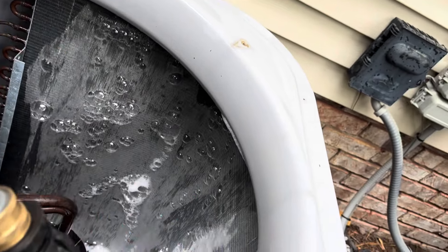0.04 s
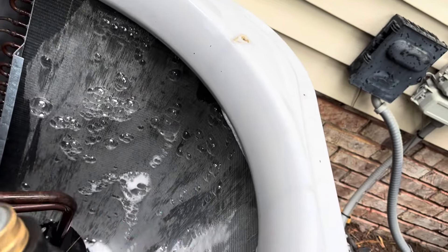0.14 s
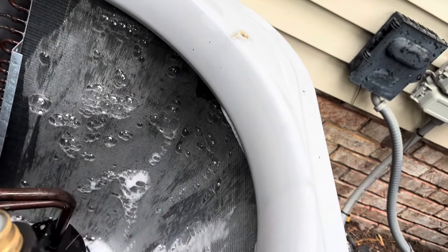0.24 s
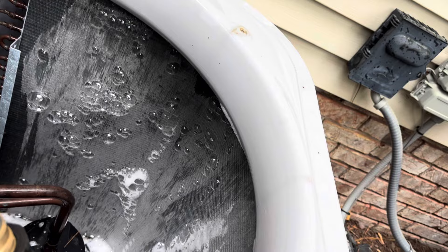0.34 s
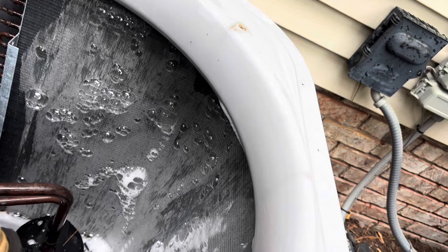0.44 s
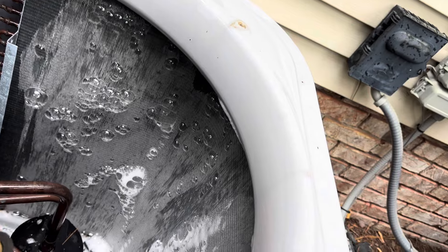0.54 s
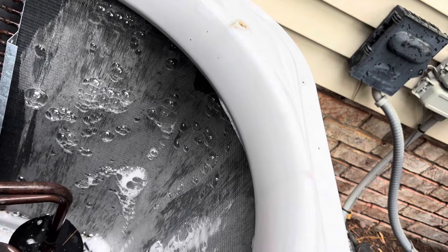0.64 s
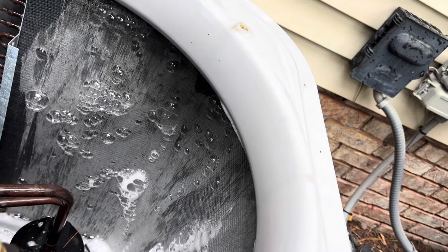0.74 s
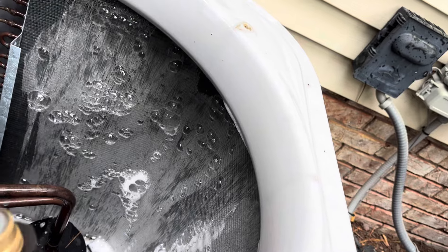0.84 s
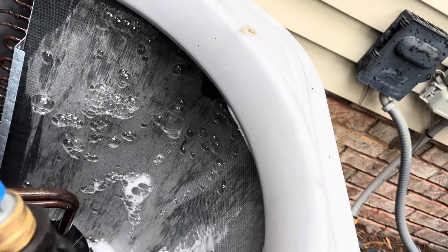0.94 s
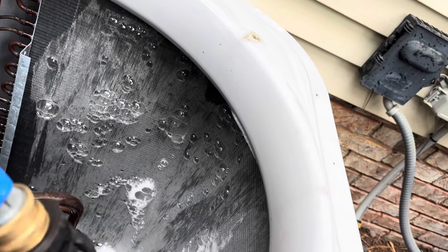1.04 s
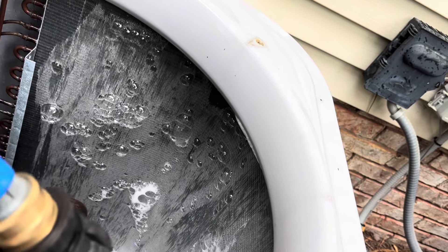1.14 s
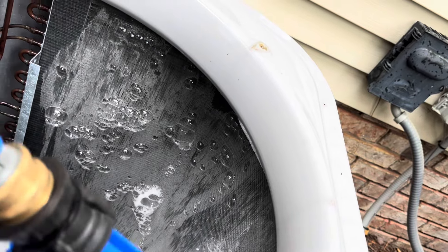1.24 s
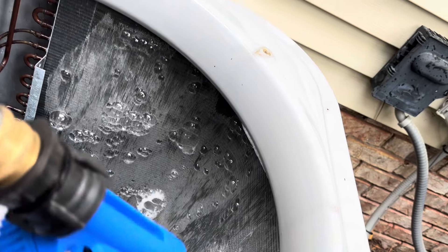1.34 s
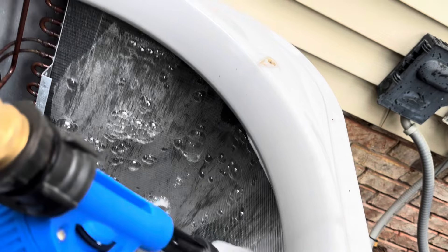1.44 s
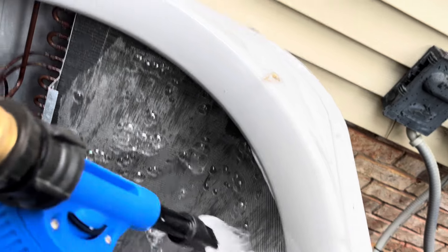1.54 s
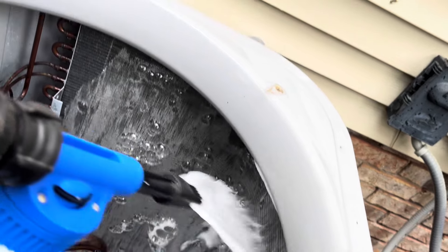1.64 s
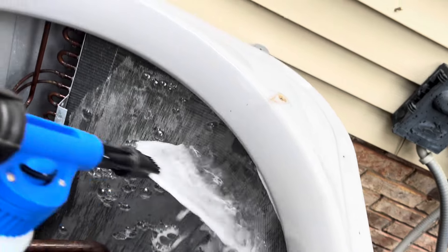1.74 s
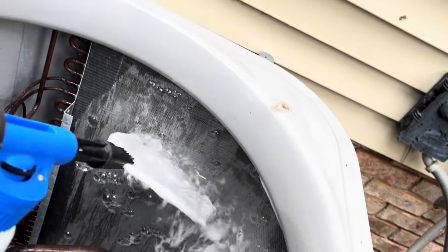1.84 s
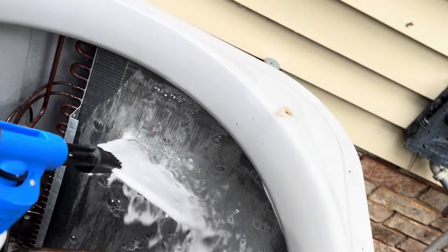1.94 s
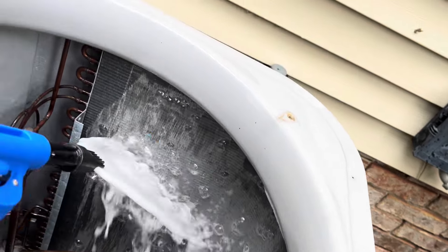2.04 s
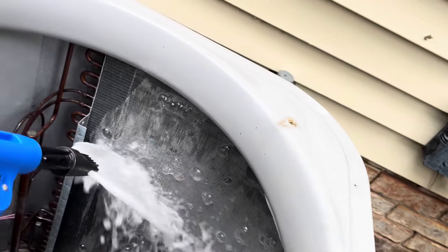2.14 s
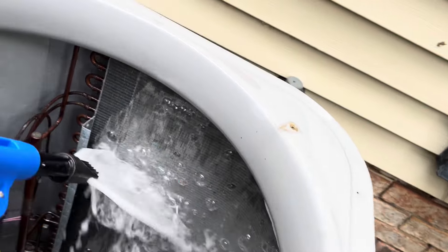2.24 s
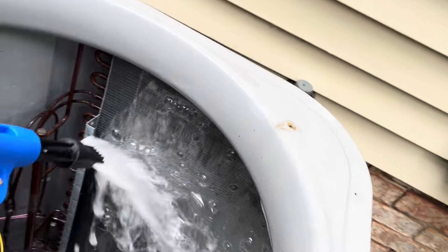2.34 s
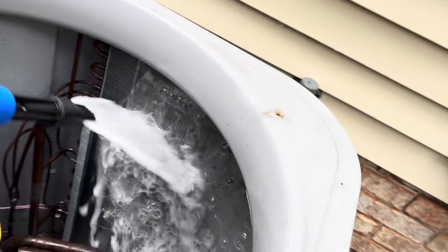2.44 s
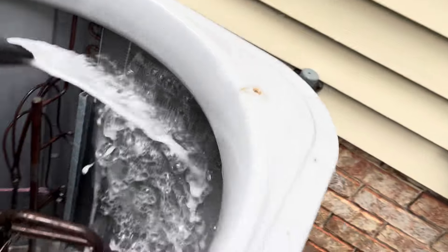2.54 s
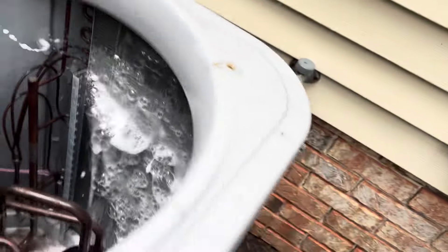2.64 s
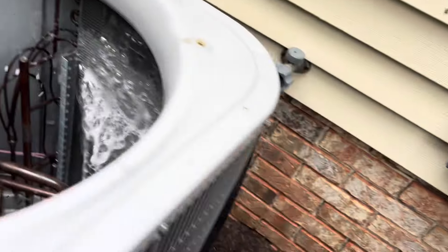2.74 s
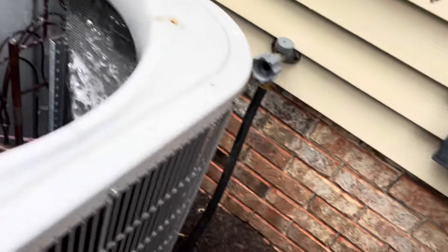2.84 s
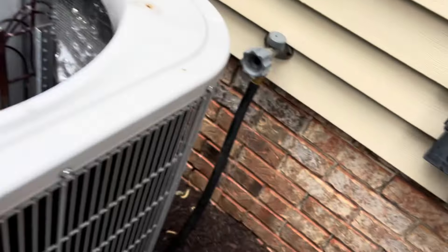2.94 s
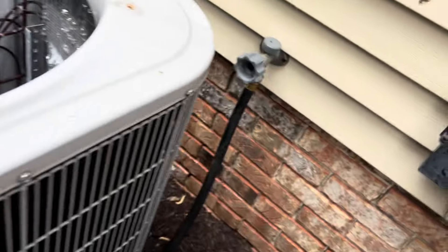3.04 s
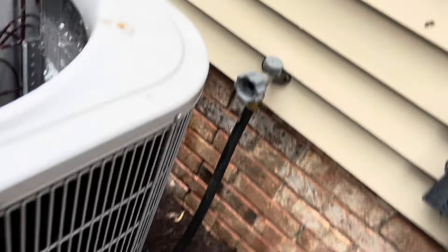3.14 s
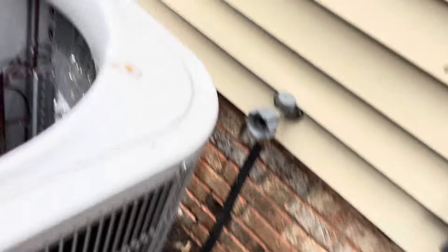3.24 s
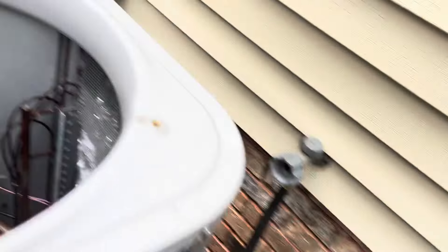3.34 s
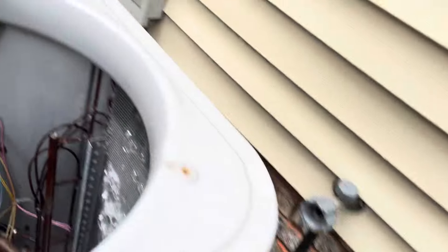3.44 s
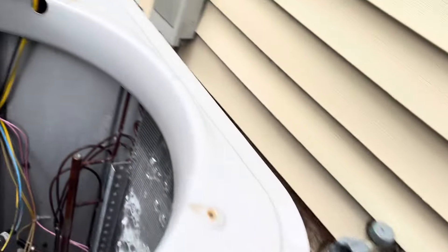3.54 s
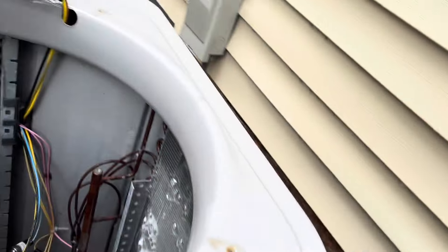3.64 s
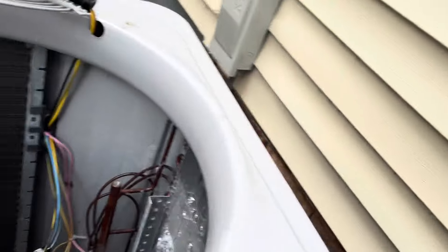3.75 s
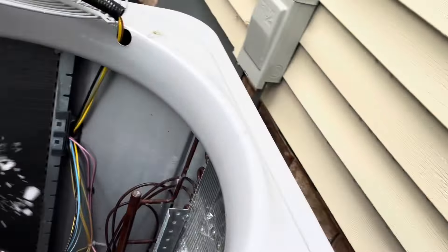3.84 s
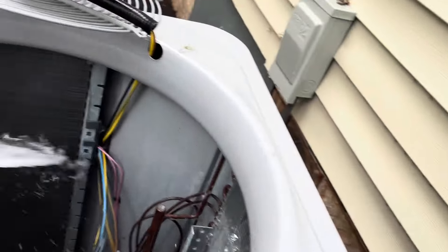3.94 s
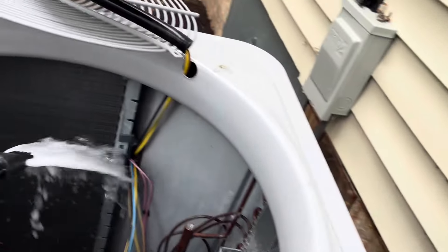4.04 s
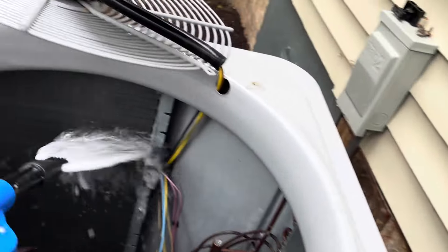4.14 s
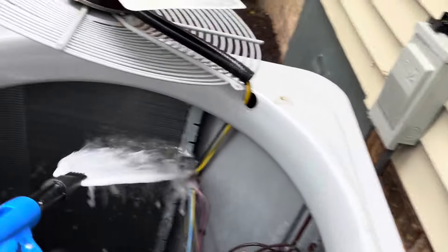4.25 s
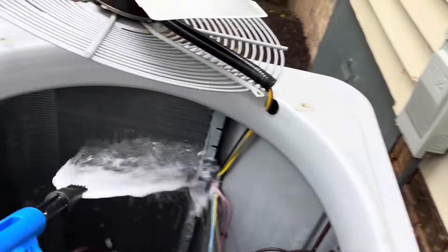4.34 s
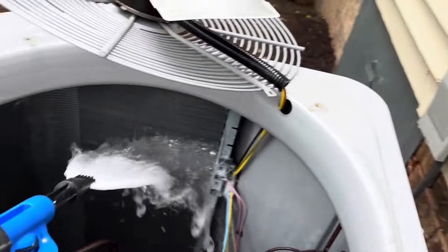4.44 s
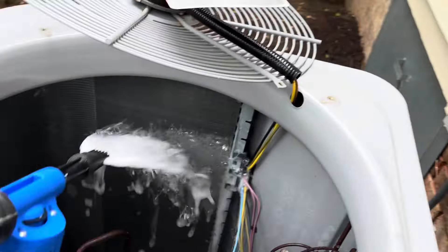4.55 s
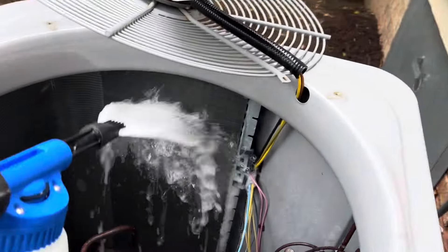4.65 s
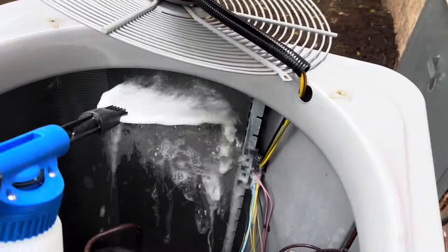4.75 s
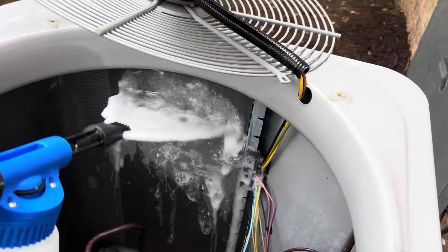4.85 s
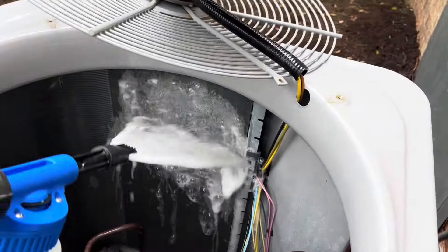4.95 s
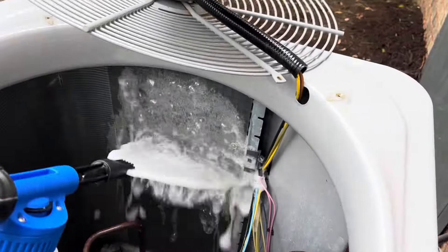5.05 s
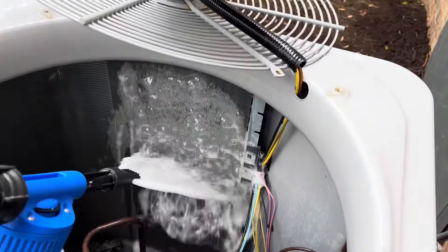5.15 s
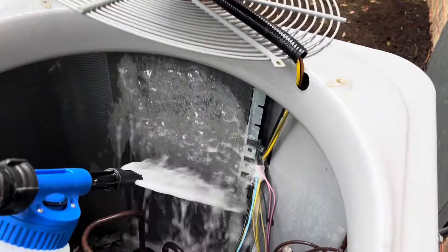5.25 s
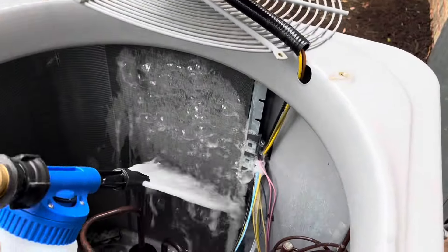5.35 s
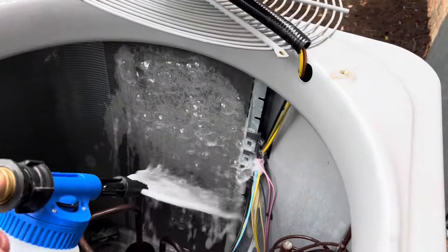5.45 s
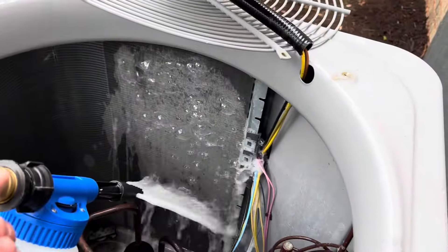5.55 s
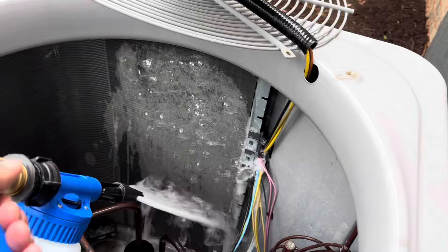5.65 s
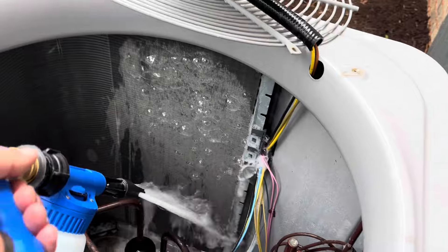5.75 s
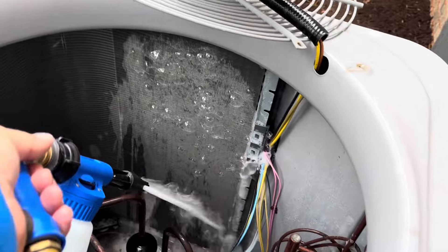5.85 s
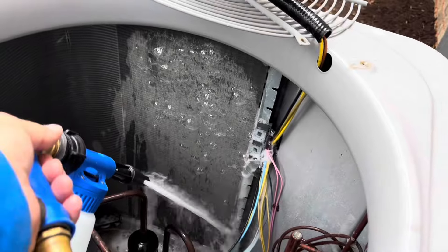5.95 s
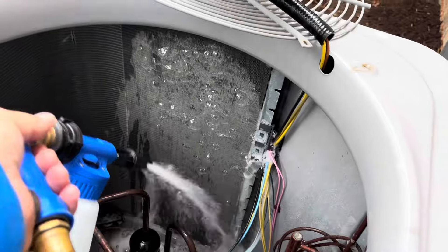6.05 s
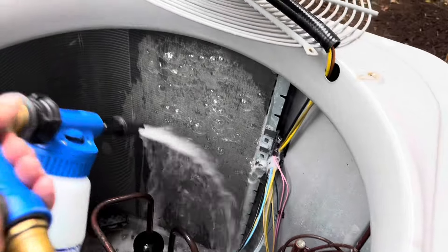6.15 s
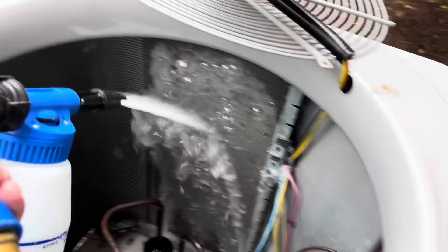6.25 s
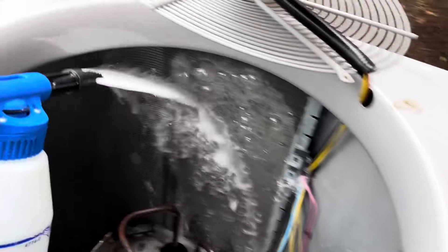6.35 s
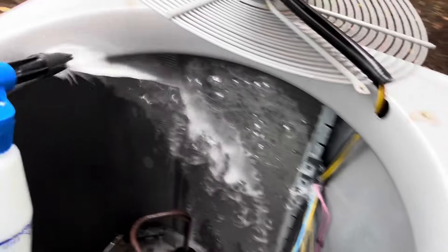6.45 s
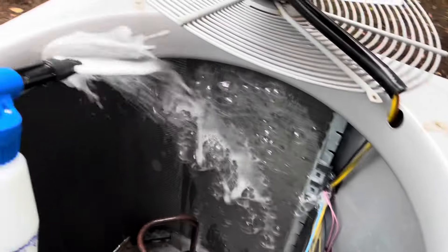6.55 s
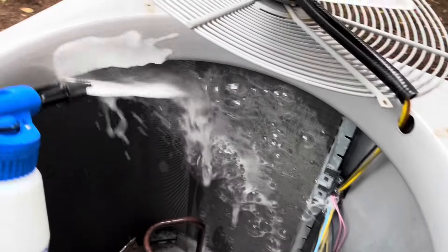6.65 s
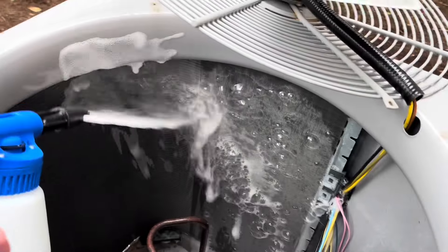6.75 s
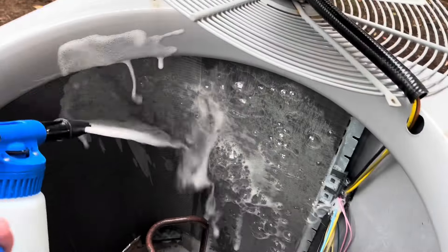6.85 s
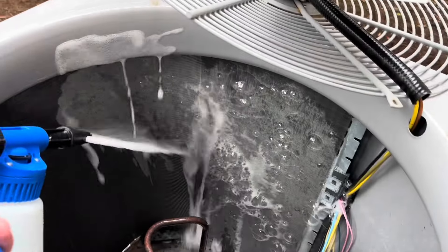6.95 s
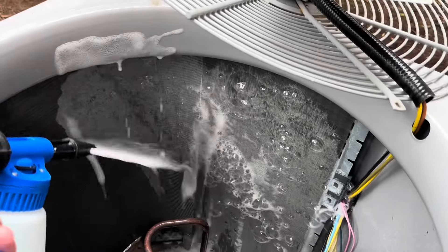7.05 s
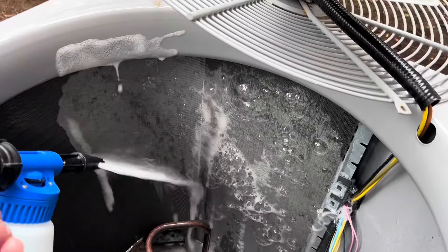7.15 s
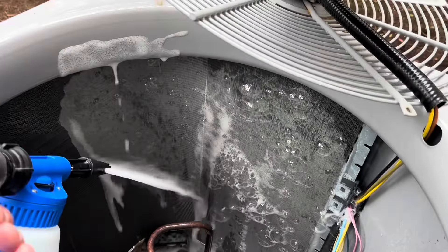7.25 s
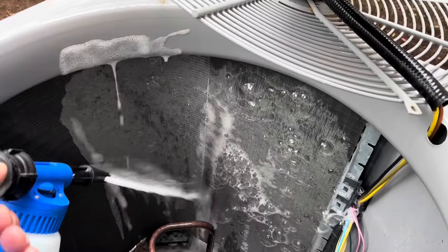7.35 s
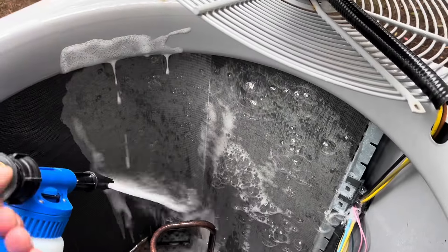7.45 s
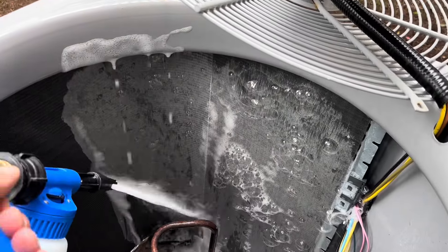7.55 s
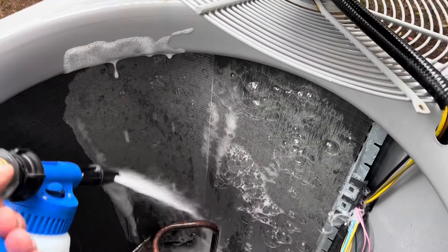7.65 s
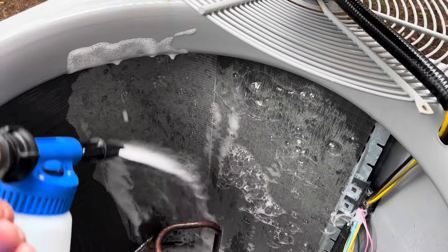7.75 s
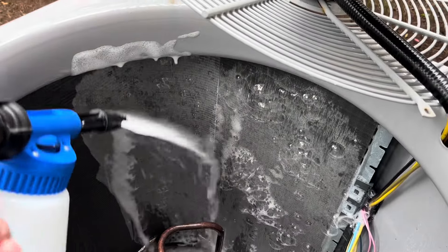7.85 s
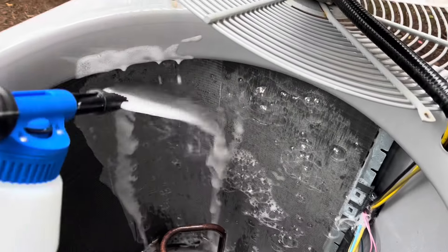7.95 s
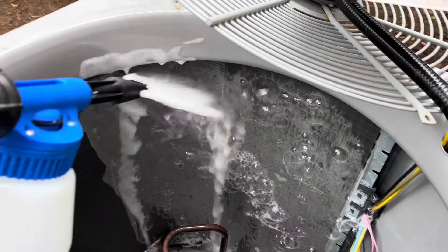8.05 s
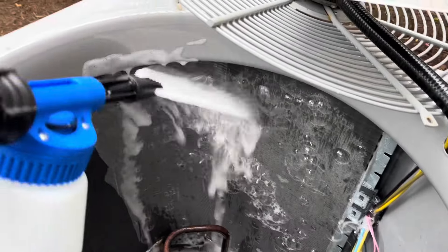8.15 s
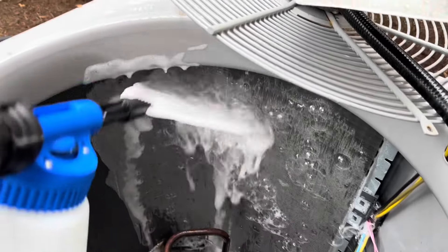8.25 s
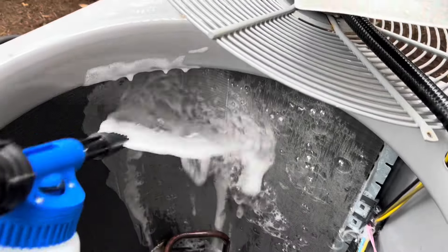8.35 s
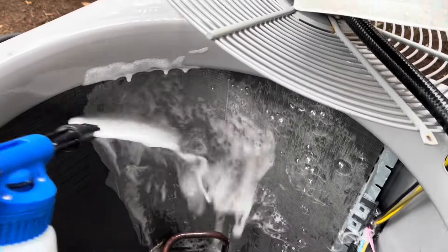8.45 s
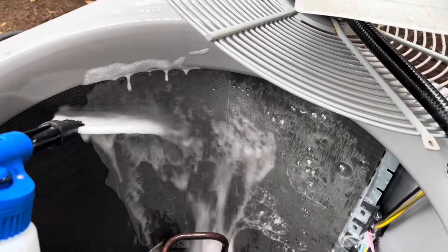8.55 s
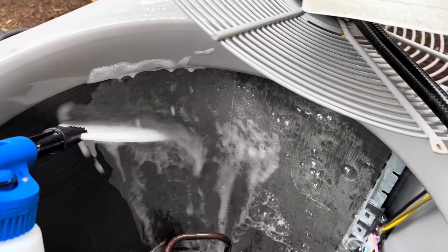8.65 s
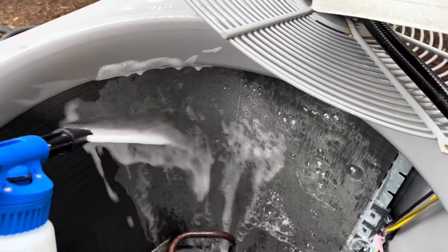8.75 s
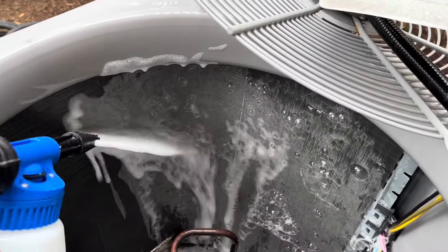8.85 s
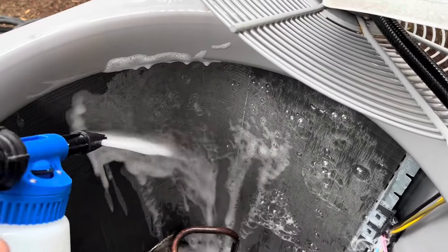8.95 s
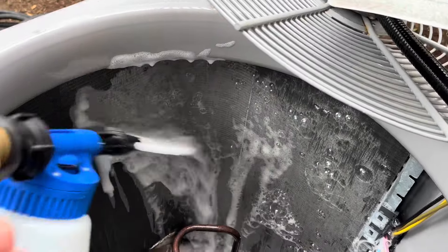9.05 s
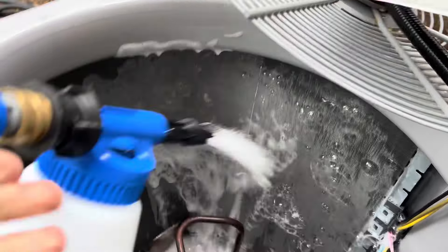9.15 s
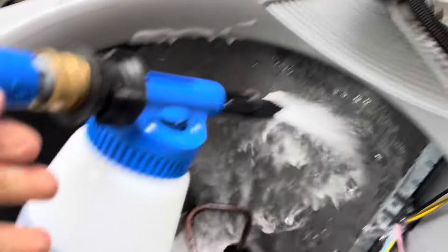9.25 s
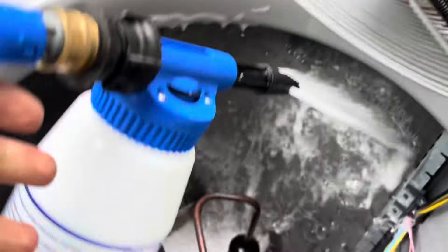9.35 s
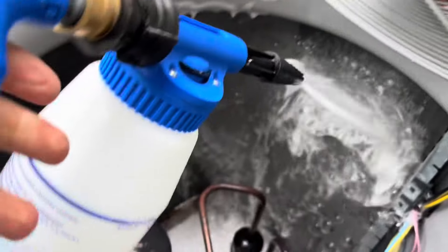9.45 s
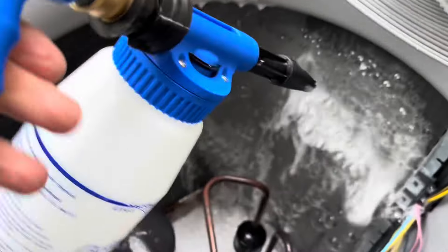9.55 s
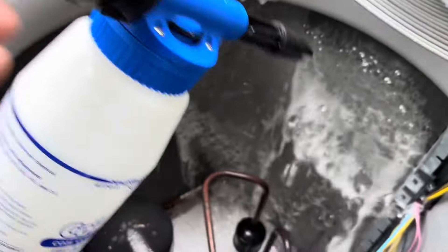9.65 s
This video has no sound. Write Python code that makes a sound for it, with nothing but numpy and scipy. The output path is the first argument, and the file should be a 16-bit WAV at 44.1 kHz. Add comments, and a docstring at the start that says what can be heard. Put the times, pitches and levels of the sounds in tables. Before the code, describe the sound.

Close stereo microphone beside a hollow metal cabinet: pressurized foam spray hisses, whistles and drums on thin fins, coloured by short wall echoes. A click and knocks end it, leaving soft wet dribbling, a tiny squeak and a clink. Trapped air squeals as the spray bursts back, wavering as it sweeps across the metal, with several hollow bumps and plastic ticks. At the very end it cuts to a bang and dripping over distant rumble.

```python
"""A hose-fed foam gun sprays the fins inside the sheet-metal cabinet of an outdoor cooling unit.
First its nozzle hisses and whistles while the jet splashes and drums on the coil, and the walls echo it.
The trigger is let go: foam dribbles, gun and hose knock on the metal, the gun squeaks and a fitting clinks.
Trapped air then shrieks out as the jet returns; more knocks follow, and at the end the jet stops and drips.
Filtered noise makes the spray, foam and far machine rumble; fading tones and noise bursts make the blows."""
import sys
import numpy as np
from scipy import signal
from scipy.fft import rfft, irfft, next_fast_len
from scipy.io import wavfile

SR = 44100
rng = np.random.default_rng(int(sys.argv[2]) if len(sys.argv) > 2 else 0)


def waveform_to_disk(signal):
    """Save audio, clipped to [-1, 1], as 16-bit WAV at the path in sys.argv[1]."""
    frames = np.transpose(np.atleast_2d(signal))
    scaled = np.clip(frames, -1, 1) * 32767
    samples = np.round(scaled).astype(np.int16)
    wavfile.write(sys.argv[1], SR, samples)


N = 427329
HOP = 256  # samples between the frames in which moving spectra are drawn
TIME = np.arange(N) / SR
FRAME_S = np.arange(N // HOP + 5)[:, None] * HOP / SR
BIN_HZ = np.fft.rfftfreq(4 * HOP, 1 / SR)

# squeezes of the trigger:
# (opens [s], closes [s], width of the coil face's note [Hz], lift of that note [dB])
SQUEEZES = [(-0.5, 2.497, 90, 4.5), (3.705, 9.419, 110, 6)]
# resonances of the air inside the cabinet: (pitch [Hz], width [Hz], lift [dB])
CABINET_AIR = [(627, 150, 3), (900, 170, 8), (1018, 69, -5.5), (1164, 90, 7), (1315, 320, -3.5),
               (1665, 340, 5.5), (2060, 180, 1), (2200, 146, 5.5), (2390, 150, 1.5), (2616, 220, 5.5),
               (3000, 300, -0.5), (3350, 210, 1.5), (3540, 110, -1.5), (3790, 150, 4.5), (4140, 220, -1.5),
               (4700, 230, 6), (5870, 550, 3)]
# nozzle whistle and hiss as the gun moves, before the offsets in nozzle():
# (time [s], hiss level [dB], lift of the lower hiss [dB], lift of the whistle [dB])
NOZZLE_MOVES = [(0, -35, -3.5, -3.5), (0.25, -38, -2, -3.5), (0.7, -36, -4.5, -5.5), (1.35, -32.5, -5, -3),
                (2.05, -34.5, -6.5, -4), (2.45, -34.5, -7, -2), (4.15, -33, -9.5, -1), (4.35, -36, -6, -4),
                (4.7, -34, -7, -2.5), (5.4, -35.5, -8, -3.5), (5.9, -34.5, -9.5, -2.5),
                (6.55, -34.5, -9, -3.5), (6.85, -35.5, -8.5, -6), (7.5, -35.5, -10, -4.5),
                (7.85, -34, -8, -4), (8.5, -35.5, -7.5, -3.5), (9.0, -35, -8.5, -5),
                (9.27, -33.5, -10.5, -2.5)]
# spectrum of fine spray: (frequency [Hz], relative level [dB])
FINE_SPRAY = [(6000, -18), (9300, 0), (12000, -0.5), (14000, 2.5), (15700, 1.5)]
# spectrum of the jet drumming on the coil: (frequency [Hz], relative level [dB])
COIL_DRUM = [(60, -48), (120, 6.5), (170, 5.5), (260, 2.5), (380, -1.5), (600, -12), (1500, -57)]
# spectrum of a sharp click: (frequency [Hz], relative level [dB])
CLICK_SPECTRUM = [(300, 0), (1200, 6.5), (2600, -3.5), (4300, -5.5), (5500, -13), (9000, -13), (15000, -19)]


def amp(db):
    """Turns decibels into a gain."""
    return 10 ** (np.asarray(db) / 20)


def evened(x):
    """Scales a sound to rms 1."""
    return x / np.sqrt(np.mean(x ** 2) + 1e-20)


def colour(points, hz=BIN_HZ):
    """Gain of a spectrum table at the given frequencies."""
    f, db = np.transpose(points)
    return amp(np.interp(np.log(hz + 1), np.log(f), db))


def follow(rows, t):
    """Reads the columns of a table at the places t, with straight lines between its rows."""
    s, *columns = np.transpose(rows)
    return [np.interp(t, s, c) for c in columns]


def bell(hz, centre, width):
    """Gain of one resonance: 1 at its centre, less to either side."""
    return 1 / np.sqrt(1 + (2 * (hz - centre) / width) ** 2)


def lifted(hz, resonances):
    """Gain of a table of resonances standing on a flat floor."""
    return amp(sum(db * bell(hz, centre, width) ** 2 for centre, width, db in resonances))


def dying(t, t60):
    """Falls 60 dB in t60 seconds."""
    return np.exp(-np.log(1000) * t / t60)


def swell(middle, length):
    """A smooth rise and fall of height 1."""
    return np.exp(-2 * ((TIME - middle) / length) ** 2)


def swells(rows, rest_db):
    """Gain of a table of swells standing on a steady level."""
    power = sum((amp(db) * swell(middle, length)) ** 2 for middle, length, db, *_ in rows)
    return np.sqrt(amp(rest_db) ** 2 + power)


def drift(t, rate):
    """Random wandering of rms 1, with changes up to the given rate per second."""
    speeds = np.geomspace(rate / 10, rate, 20)
    return evened(sum(np.sin(2 * np.pi * (f * t + rng.random())) / np.sqrt(f) for f in speeds))


def sample_drift(rate):
    """The same wandering, drawn frame by frame and filled in for every sample."""
    return np.interp(TIME, FRAME_S[:, 0], drift(FRAME_S[:, 0], rate))


def flutter(depth_db, rate):
    """A gain that wavers at random."""
    return amp(depth_db * sample_drift(rate))


def noise(gain):
    """Two unrelated noises of rms 1 with a fixed or moving spectrum."""
    z = rng.standard_normal((2, len(FRAME_S), 2 * len(BIN_HZ))).view(complex) * gain
    _, sound = signal.istft(z, nperseg=4 * HOP, noverlap=3 * HOP, time_axis=1, freq_axis=2)
    return evened(sound[:, :N])


def burst(gain):
    """Two unrelated noises of rms 1 with the given spectrum, made in one piece."""
    return evened(irfft(rng.standard_normal((2, 2 * len(gain))).view(complex) * gain))


def add(mix, s, sound):
    """Adds a sound to the mix from time s on."""
    part = mix[:, round(s * SR):][:, :sound.shape[1]]
    part += sound[:, :part.shape[1]]


def jet():
    """Spray leaves the nozzle and lands on the coil; the valve lets it through or stops it."""
    open_s, shut_s = 0.037, 0.037  # how long the valve takes to open and to shut
    valve = 0
    for opens, closes, *_ in SQUEEZES:
        ramp = np.minimum((TIME - opens) / open_s, (closes - TIME) / shut_s)
        valve = valve + np.clip(ramp + .5, 0, 1)
    # air in the line starves the jet soon after the valve opens
    starve_after_s, starve_length_s = 0.19, 0.29
    starved = sum(swell(opens + starve_after_s, starve_length_s) for opens, *_ in SQUEEZES)
    space = roaming_hollow() * wall_echoes()
    stream = nozzle(space, starved) + landing(space, starved)
    # slugs of foam make the whole stream waver
    return stream * flutter(depth_db=.5, rate=70) * valve


def nozzle(space, starved):
    """Turbulence at the nozzle hisses and rings its cavity as a whistle, with fine spray on top."""
    # spectrum of the hiss: (frequency [Hz], relative level [dB])
    hiss_spectrum = [(900, -35), (1900, -8), (2400, -5.5), (3300, 1), (4200, 1.5), (5300, -0.5), (6000, 0),
                     (8000, 3), (9000, -2.5), (12000, -4.5), (15700, -5.5)]
    # middle note of the whistle: (time [s], pitch [Hz])
    whistle_notes = [(0, 7200), (1, 7140), (1.3, 7430), (2.5, 7490), (4.15, 7400), (4.6, 7200),
                     (5.25, 7270), (5.7, 7120), (6.15, 7430), (6.65, 7420), (7.35, 7100), (8.6, 7400),
                     (9.4, 7050)]
    hiss_db, _, ringing_db = follow(NOZZLE_MOVES, TIME)
    _, facing_db, _ = follow(NOZZLE_MOVES, FRAME_S)

    # the aim of the gun brings the lower part of the hiss forward or turns it away
    aimed = amp((facing_db + 4) * bell(BIN_HZ, centre=3300, width=5100) ** 2)
    hiss = amp(hiss_db - 6.5 * starved) * noise(colour(hiss_spectrum) * space * aimed)

    pitch = follow(whistle_notes, FRAME_S)[0] + 70 * drift(FRAME_S, rate=11)  # wobble of 70 Hz rms
    whistle_db = hiss_db + 1.9 * ringing_db + 2 - 15 * starved
    whistle = amp(whistle_db) * noise(cavity(pitch) * space) * flutter(depth_db=1.5, rate=27)

    # fine spray spreads widely: it takes 0.97 of the hiss's changes around its usual -35 dB
    fizz_db = -39 + 0.97 * (hiss_db + 35)
    fizz = amp(fizz_db) * noise(colour(FINE_SPRAY) * space)
    return hiss + whistle + fizz


def cavity(pitch):
    """Spectrum of the nozzle's whistle: a narrow core between two weaker notes, on wide skirts."""
    core_hz, spacing_hz, skirts_hz = 330, 430, 2200
    core = bell(BIN_HZ, pitch, core_hz) ** 2
    beside = sum(bell(BIN_HZ, pitch + side * spacing_hz, core_hz) ** 2 for side in (-1, 1))
    return core + 0.19 * beside + 0.19 * bell(BIN_HZ, pitch, skirts_hz) ** 2


def landing(space, starved):
    """The jet splashes on the fins, brings out a note of the coil face, and drums on some spots."""
    # spectrum of the splash: (frequency [Hz], relative level [dB])
    splash_spectrum = [(150, -43), (350, -2), (500, 0), (800, -4), (1150, -0.5), (1450, 0.5), (2000, -7.5),
                       (3200, -10.5), (6000, -13.5)]
    # splash on the fins, lowered by 1 dB below: (time [s], level [dB])
    splash_levels = [(0, -40), (0.65, -43.5), (1.05, -38), (2.05, -40.5), (2.5, -38), (3.9, -37.5),
                     (4.17, -37.5), (4.3, -42), (5, -39.5), (5.65, -44), (6.55, -38.5), (6.9, -42.5),
                     (7.65, -42.5), (8.55, -38), (9.4, -39)]
    # note of the coil face as the jet moves across it: (time [s], pitch [Hz])
    face_notes = [(0, 634), (2.5, 690), (3.7, 980), (4.7, 1040), (5.6, 925), (6.3, 905), (7.8, 860),
                  (9.4, 900)]
    # the jet crosses spots where the coil drums, lowered by 1 dB below:
    # (middle [s], length [s], level [dB])
    drum_spots = [(.1, 0.41, -45.5), (1.05, 0.63, -45.5), (1.79, 0.11, -43.5), (4.16, 0.14, -40.5),
                  (4.385, 0.07, -39), (4.78, 0.17, -43), (6.62, 0.27, -45), (7.5, 0.13, -52),
                  (8.45, 0.13, -49)]

    note = follow(face_notes, FRAME_S)[0] * (1 + 0.059 * drift(FRAME_S, rate=9))
    face_db = 0
    for opens, closes, width, db in SQUEEZES:
        spraying = (FRAME_S > opens) & (FRAME_S < closes)
        face_db = face_db + spraying * db * bell(BIN_HZ, note, width) ** 2

    level_db = follow(splash_levels, TIME)[0] - 1 - 6.5 * starved
    splash = amp(level_db) * noise(colour(splash_spectrum) * space * amp(face_db))
    splash *= flutter(depth_db=0.52, rate=43)
    drum_gain = amp(-1) * swells(drum_spots, rest_db=-57)
    drum = drum_gain * noise(colour(COIL_DRUM)) * flutter(depth_db=-1.0, rate=47)
    return splash + drum


def wall_echoes():
    """Short echoes off the walls comb the spray; the comb slides as the gun is swept about."""
    delays = np.geomspace(.001, .005, 7)  # seconds
    strength = .13 * bell(BIN_HZ, 6500, 8000)
    paths = 0
    for delay in delays:
        moving_delay = delay + 1e-4 * drift(FRAME_S, 1.6)
        paths = paths + strength * np.exp(-2j * np.pi * BIN_HZ * moving_delay)
    return abs(1 + paths) / np.sqrt(1 + len(delays) * strength ** 2)


def roaming_hollow():
    """Each resonance of the cabinet's air wanders and swells by itself as the gun moves about."""
    sway, swelling = .011, .22  # rms shares by which pitch and lift change
    total_db = 0
    for hz, width, db in CABINET_AIR:
        lift_db = db * (1 + swelling * drift(FRAME_S, rate=2.5))
        centre = hz * (1 + sway * drift(FRAME_S, rate=1.56))
        total_db = total_db + lift_db * bell(BIN_HZ, centre, width) ** 2
    return amp(total_db)


def spit():
    """Trapped air shrieks raggedly as the trigger opens, and the first slug drums on the coil."""
    start_s, rise_s, hold_s, t60 = 3.696, 0.024, 0.075, 0.41
    start_hz, sag_hz_per_s = 2600, 3200
    age = TIME - start_s
    fading = np.maximum(age - hold_s, 0)
    level = amp(-34.5) * np.clip(age / rise_s, 0, 1) * dying(fading, t60)
    # the pitch sags for the first third of the fade and wobbles by 110 Hz rms
    pitch = start_hz - sag_hz_per_s * np.minimum(fading, t60 / 3) + 110 * sample_drift(rate=80)
    shriek = quaver(pitch, width_hz=620) + amp(-3) * quaver(1.68 * pitch, width_hz=1900)
    slug = amp(-5) * dying(np.maximum(age, 0), t60=1.0) * noise(colour(COIL_DRUM))
    return level * (shriek * flutter(depth_db=-1.0, rate=76) + slug)


def quaver(pitch, width_hz):
    """Two narrow noises of rms 1 that follow a quickly moving pitch."""
    r = np.exp(-np.pi * width_hz / SR)
    rough = rng.standard_normal((2, 2 * len(pitch))).view(complex)
    slow = signal.lfilter([1], np.poly([r, r]), rough)
    # turning the slow noise round at the pitch moves it up to that pitch
    return evened((slow * np.exp(2j * np.pi * np.cumsum(pitch) / SR)).real)


def dribble():
    """Once the valve shuts, foam drains with a soft wash, its bubbles pop, and leftovers spurt."""
    # spectrum of trickling foam: (frequency [Hz], relative level [dB])
    trickle = [(200, 5), (600, 3.5), (1800, 5.5), (3000, -5.5), (5500, -5), (7500, -5), (10000, -9),
               (15500, -17)]
    # spurts of leftover foam: (middle [s], length [s], level [dB], brightest frequency [Hz])
    spurt_rows = [(2.6, 0.073, -52.5, 3500), (2.714, 0.0073, -58, 4500), (2.912, 0.013, -60, 5500),
                  (2.98, 0.1, -68, 3700), (3.125, 0.035, -57.5, 2200), (3.168, 0.042, -56, 3000),
                  (3.295, 0.012, -60, 2800), (3.44, 0.092, -63.5, 1800), (3.56, 0.07, -50, 3300),
                  (3.645, 0.039, -56.5, 3800), (9.683, 0.012, -49.5, 2240)]
    # fine foam spits at the nozzle's tip: (middle [s], length [s], level [dB])
    tip_spits = [(2.51, 0.081, -46), (2.6, 0.077, -55), (2.668, 0.0055, -47), (2.909, .009, -51),
                 (3.29, .008, -65), (3.4, .006, -59), (9.45, 0.099, -48), (9.6, 0.03, -51)]

    draining = sum((TIME > closes) * dying(abs(TIME - closes), t60=0.26) for _, closes, *_ in SQUEEZES)
    level = amp(-45) * draining + swells(spurt_rows, rest_db=-81)
    level *= flutter(depth_db=3.1, rate=91)

    # each spurt has its own colour
    *_, brightest = follow(spurt_rows, FRAME_S)
    wash = noise(colour(trickle) * amp(7 * bell(BIN_HZ, brightest, width=3000) ** 2))

    pops_per_s, spread_db = 300, 7
    sizes = amp(spread_db * np.minimum(rng.exponential(1, N), 2))
    pops = sizes * (rng.random(N) < pops_per_s / SR)
    hz = np.fft.rfftfreq(HOP, 1 / SR)
    pop = burst(colour(trickle, hz)) * dying(TIME[:HOP], t60=0.0062)
    crackle = evened(signal.oaconvolve(pops[None], pop, axes=1)[:, :N])

    sputter = swells(tip_spits, rest_db=-88) * noise(colour(FINE_SPRAY))
    return level * (amp(1) * wash + amp(-5) * crackle) + sputter


def knocks():
    """Each blow clicks and rings the panels; a moment later the cabinet heaves at its own low pitch."""
    # blows on the cabinet: (time [s], thump level [dB], hardness as click minus thump [dB],
    # thump pitch [Hz], thump's time to fall 60 dB [s])
    blows = [(2.498, -24.5, -7.5, 326, 0.042), (2.525, -27.5, 1.5, 281, 0.19),
             (2.537, -23.5, -39, 93, 0.37), (2.538, -35, -15, 386, 0.28), (2.567, -29, -7.5, 134, 0.25),
             (2.611, -36, -44, 274, 0.21), (3.671, -18.5, -19, 181, 0.067), (3.671, -18.5, -42, 285, 0.072),
             (5.956, -21.5, -62, 139, 0.064), (6.433, -14.5, -6.5, 100.5, 0.13),
             (6.469, -16, -45, 101, 0.1), (6.488, -14, -11, 110, 0.072), (6.518, -26, -3, 163, 0.13),
             (6.532, -22, -11, 94, 0.19), (7.368, -16.5, -38, 162, 0.081), (7.375, -36.5, -40, 253, 0.27),
             (7.405, -27.5, -38, 123, 0.18), (7.953, -14, -9.5, 96, 0.14), (7.982, -24, -21, 166, 0.18),
             (8.01, -20.5, -8, 120.4, 0.42), (8.045, -26.5, -45, 119, 0.32), (8.35, -28.5, -11, 345, 0.098),
             (8.36, -24, -38, 63.4, 0.22), (9.412, -30, -4.5, 70.5, 0.21), (9.578, -11.5, -14.5, 126, 0.12),
             (9.58, -15, -44, 246.4, 0.19), (9.6, -29, -17, 486, 0.2), (9.633, -23, -28, 157, 0.28),
             (9.667, -27, -15, 330, .25)]
    # modes of the panels: (pitch [Hz], relative level [dB], time to fall 60 dB [s])
    panel_modes = [(223.5, -11.5, .3), (457, -6, 0.15), (518, -16.5, 0.39), (564, -10, 0.22),
                   (638, -10, 0.25), (695, -9.5, 0.19), (780, -20, 0.39), (910, -19, 0.16),
                   (924, -7.5, 0.13), (1140, -16, 0.17), (1300, -24, 0.15), (1386, -12, 0.16),
                   (1546, -8, 0.12), (1770, -9, 0.071)]
    # spectrum of the panels' loose rattle: (frequency [Hz], relative level [dB])
    clang_spectrum = [(60, -40), (170, 22), (300, 7), (550, 12), (950, 9), (1400, 7.5), (2200, -0.5),
                      (4000, -5), (6000, -10.5), (15000, -50)]
    thump_rise_s, clang_rise_s, thump_lag_s, chatter_lag_s = 0.0048, 0.0024, 0.009, 0.034

    out = np.zeros((2, N))
    t = TIME[:SR // 2]
    hz = np.fft.rfftfreq(SR // 2, 1 / SR)
    hollow = lifted(hz, CABINET_AIR)
    soft_start = 1 - np.exp(-(t / thump_rise_s) ** 2)
    for s, thump_db, hardness_db, thump_hz, thump_t60 in blows:
        click = burst(colour(CLICK_SPECTRUM, hz) * hollow) * dying(t, t60=0.062)

        # the loose rattle keeps its own fall time beside the ring of the panels
        rattle = amp(-3) * burst(colour(clang_spectrum, hz)) * dying(t, t60=.11)
        clang = (rattle + amp(-4) * modes(panel_modes, t)) * (1 - np.exp(-t / clang_rise_s))
        # a loose panel rattles again just after the blow
        chatter = amp(-14) * burst(colour(clang_spectrum, hz) * hollow) * dying(t, t60=0.25)
        add(clang, chatter_lag_s, chatter * (1 - np.exp(-t / thump_rise_s)))

        # the thump is a main swing among many weaker low modes
        swing = np.exp(2j * np.pi * thump_hz * t) * dying(t, thump_t60) * soft_start
        low_modes = bell(hz, 1.5 * thump_hz, thump_hz) ** 2 * np.minimum(hz / thump_hz, 1)
        boom = amp(-12) * burst(low_modes) * abs(swing)
        thump = np.array([swing.imag, swing.real]) + boom

        # harder blows rattle the panels more
        clang_db = -4 + 0.45 * hardness_db
        add(out, s, amp(thump_db) * (amp(hardness_db) * click + amp(clang_db) * clang))
        add(out, s + thump_lag_s, amp(thump_db) * thump)
    return out


def modes(table, t):
    """The ring of a struck object: fading tones whose strengths differ from blow to blow."""
    ring = 0
    for hz, db, t60 in table:
        level = amp(db + 1.5 * rng.standard_normal())
        ring = ring + level * dying(t, t60) * np.sin(2 * np.pi * (hz * t + rng.random((2, 1))))
    return ring


def taps():
    """Plastic ticks: one quickly dying resonance, weaker ones around it, and a faint wide snap."""
    # taps of the plastic gun and its trigger, alone or against the cabinet:
    # (time [s], level [dB], pitch [Hz], time for the ring to fall 60 dB [s])
    tick_rows = [(2.265, -20.5, 1990, 0.02), (2.274, -27, 1470, 0.035), (2.274, -27, 2820, .018),
                 (2.498, -27.5, 560, 0.035), (2.503, -35, 910, .03), (2.504, -30, 2580, 0.017),
                 (2.525, -29.5, 3670, 0.027), (2.526, -35, 1300, 0.094), (2.598, -29, 3300, 0.011),
                 (2.598, -29, 1890, .015), (2.613, -45, 4030, 0.023), (2.641, -47, 6840, .012),
                 (2.659, -51, 5560, 0.011), (3.48, -50, 1040, 0.054), (3.497, -44, 635, 0.038),
                 (3.528, -27, 1430, 0.026), (3.528, -48, 3700, .03), (3.553, -39, 1880, 0.033),
                 (3.563, -44, 4600, .02), (3.577, -46, 900, .035), (3.672, -37, 2450, 0.04),
                 (5.164, -29.5, 2660, 0.018), (6.433, -30, 4200, .03), (6.434, -28, 2220, 0.034),
                 (6.436, -26, 957, 0.11), (6.488, -25, 1900, 0.018), (6.495, -32, 3000, 0.018),
                 (6.624, -29, 1600, 0.04), (7.953, -31, 3500, 0.026), (7.955, -28, 926, .035),
                 (8.011, -32, 1300, 0.05), (8.356, -33, 416, 0.036), (8.357, -36, 950, .035),
                 (9.416, -31.5, 3650, .03), (9.419, -28.5, 2180, 0.026), (9.419, -27.5, 675, 0.02),
                 (9.42, -26, 420, 0.033), (9.452, -44, 1940, .03), (9.452, -44, 4700, 0.038),
                 (9.578, -22.5, 2930, 0.016), (9.579, -28, 554, .11)]
    out = np.zeros((2, N))
    t = TIME[:SR // 5]
    hz = np.fft.rfftfreq(SR // 5, 1 / SR)
    for s, db, pitch, t60 in tick_rows:
        swing = np.exp(2j * np.pi * pitch * t)
        around = amp(-4) * burst(bell(hz, pitch, pitch / 2.3) ** 2)
        ring = (np.array([swing.imag, swing.real]) + around) * dying(t, t60)
        snap = amp(-12) * burst(colour(CLICK_SPECTRUM, hz)) * dying(t, t60 / 2)
        add(out, s, amp(db) * (ring + snap) * (1 - np.exp(-t / 0.00058)))  # a very short rise
    return out


def handling():
    """In the pause the gun squeaks as a narrow sagging noise, then a metal fitting clinks and rings."""
    # modes of the fitting: (pitch [Hz], relative level [dB], time to fall 60 dB [s])
    fitting_modes = [(1100, -8, .04), (1760, 8, 0.043), (1920, 0, .045), (2331, -6, .045),
                     (2530, -1, 0.033), (4199, -9, 0.049), (4330, -10, .04), (5500, -15, .05)]
    squeak_s, length_s, squeak_hz, sag_hz_per_s = 2.765, 0.031, 2090, 1500
    pitch = squeak_hz - sag_hz_per_s * np.clip(FRAME_S - squeak_s, -length_s, length_s)
    out = amp(-57) * swell(squeak_s, length_s) * noise(bell(BIN_HZ, pitch, width=420) ** 2)

    clink_s = 2.828
    t = TIME[:SR // 2]
    hz = np.fft.rfftfreq(len(t), 1 / SR)
    snap = amp(1) * burst(colour(CLICK_SPECTRUM, hz)) * dying(t, t60=0.031)
    clink = (modes(fitting_modes, t) + snap) * (1 - np.exp(-t / 0.001))
    add(out, clink_s, amp(-43) * clink)
    return out


def outdoors():
    """Far machinery: a low rumble of noise, broadest around 55 Hz, with one hum near 106 Hz."""
    # spectrum of the rumble: (frequency [Hz], relative level [dB])
    rumble_spectrum = [(20, -41), (38, -16), (54, 1), (72, 0), (102, -1.5), (128, -11), (220, -16),
                       (400, -21), (1000, -29.5), (2500, -40.5), (6000, -50), (15000, -51)]
    # lifts on top of the rumble; only the one near 106 Hz is above 0 dB:
    # (pitch [Hz], width [Hz], lift [dB])
    hum_lifts = [(56.8, 4.6, 0), (106.3, 5, 5.5)]
    # far machinery, raised by 3 dB below: (time [s], level [dB])
    machine_levels = [(0, -48), (.8, -52), (2.3, -48), (2.8, -45.5), (3.25, -48.5), (4.3, -45), (5.2, -47),
                      (6.3, -47), (8.2, -44), (9.2, -48), (9.55, -47)]
    level_db = follow(machine_levels, TIME)[0] + 3
    hz = np.fft.rfftfreq(next_fast_len(2 * N), 1 / SR)
    rumble = burst(colour(rumble_spectrum, hz) * lifted(hz, hum_lifts))[:, :N]
    return amp(level_db) * rumble * flutter(depth_db=1.1, rate=5)


def scene():
    """Row 0 is the sound that left and right share, row 1 the scattered part."""
    return jet() + spit() + dribble() + knocks() + taps() + handling() + outdoors()


def record(dry):
    """Gives left and right a stereo pattern that depends on frequency, then cuts off the top."""
    # stereo pattern by frequency: (frequency [Hz], phase by which left leads [rad],
    # likeness of left and right [0-1], left minus right [dB])
    stereo_pattern = [(100, 0.01, 0.98, -0.5), (500, 0.45, 0.88, 2.2), (920, 1.0, 0.72, 7.0),
                      (1250, 1.9, .75, 3.4), (1500, 3.02, 0.7, 3.6), (1900, 5.1, 0.7, 2.3),
                      (2350, 6.37, 0.9, 1.0), (2900, 7.35, .68, 3.5), (3250, 7.1, 0.36, 6.3),
                      (3600, 6.28, 0.97, 0.6), (4000, 6.28, 1.0, 0), (5050, 6.3, 0.98, 0.0),
                      (5400, 5.95, .72, -1), (5850, 6.15, 0.74, -1.9), (6400, 6.28, 1.0, 0.0),
                      (7450, 6.26, 0.98, 0.0), (8250, 5.3, .68, .3), (8850, 4.3, 0.65, 0.1),
                      (9100, 3.45, .88, 0), (9550, 3.15, 1.0, 0.0), (10350, 3.13, 0.99, 0.0),
                      (10900, 2.85, .83, 0), (11100, 2.1, .64, 0), (11650, 1.15, 0.64, 0.0),
                      (11850, 0.0, 1.0, 0.0), (13150, 0, 0.99, 0.0), (13650, -.35, .84, 0),
                      (13850, -1.05, .64, 0), (14400, -2.0, 0.64, 0.0), (14650, -2.85, .86, 0),
                      (15200, -3.13, 0.99, 0.0)]
    shared, scattered = rfft(dry)
    hz = np.fft.rfftfreq(N, 1 / SR)
    phase, likeness, balance_db = follow(stereo_pattern, hz)
    likeness = np.clip(likeness, 0, 1)
    # the less alike left and right are, the more scattered sound goes to the right
    right = likeness * shared + np.sqrt(1 - likeness ** 2) * scattered
    right = right * np.exp(-1j * phase) / amp(balance_db / 2)
    left = shared * amp(balance_db / 2)
    pair = irfft(np.array([left, right]), N)
    low_pass = signal.firwin(511, 15750, window=("kaiser", 9), fs=SR)  # edge in Hz
    return signal.oaconvolve(pair, low_pass[None], "same")


dry = scene()
out = record(dry)
waveform_to_disk(out)
```